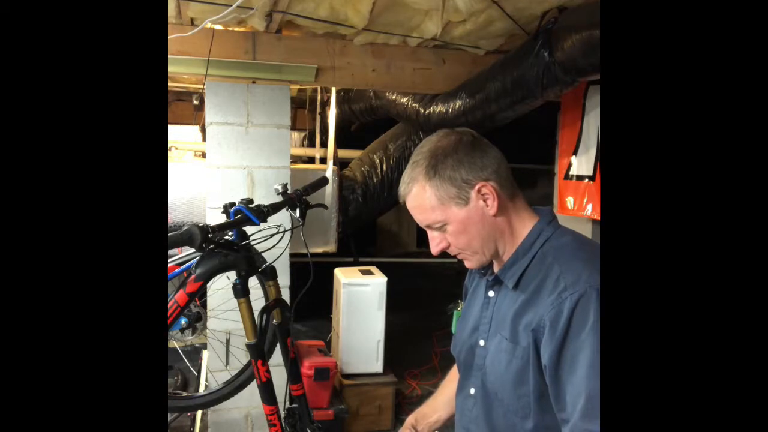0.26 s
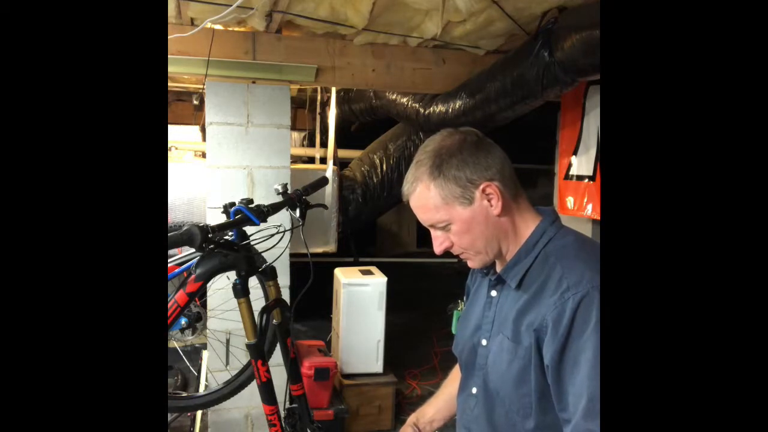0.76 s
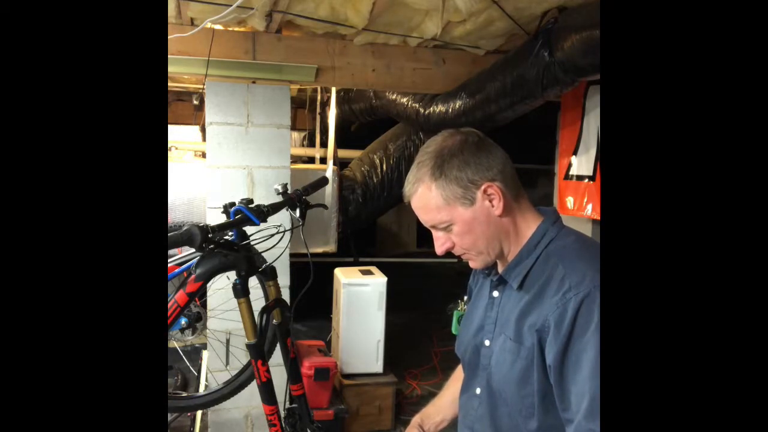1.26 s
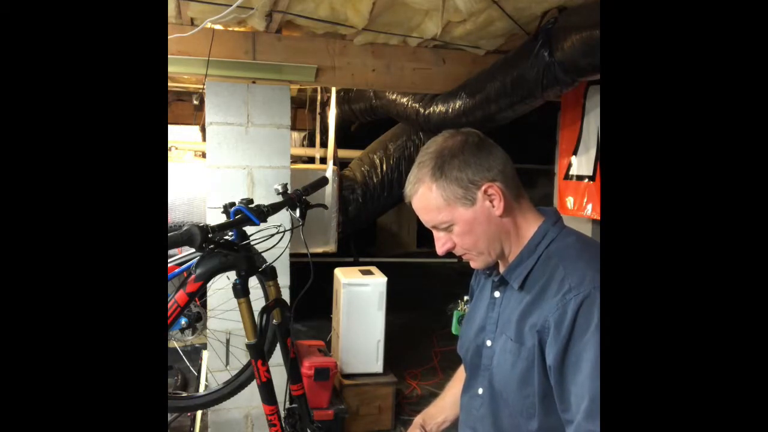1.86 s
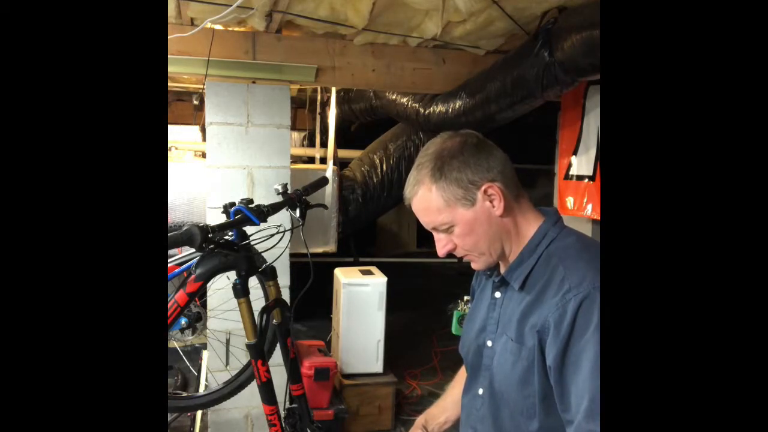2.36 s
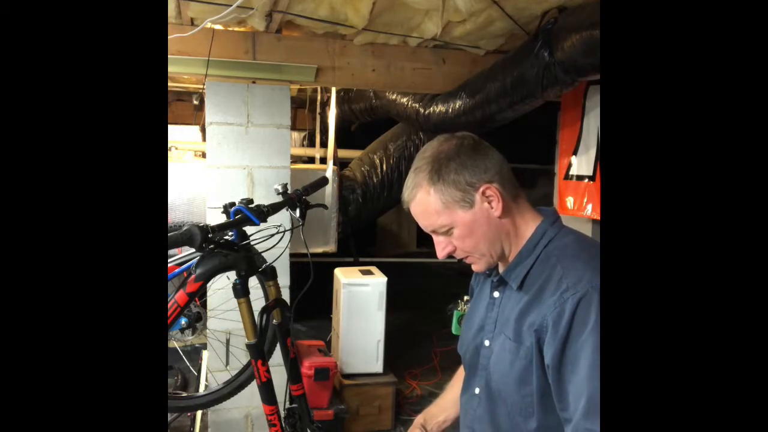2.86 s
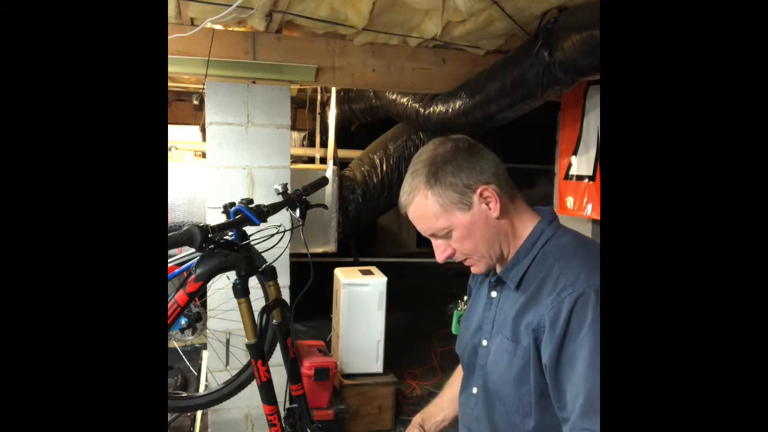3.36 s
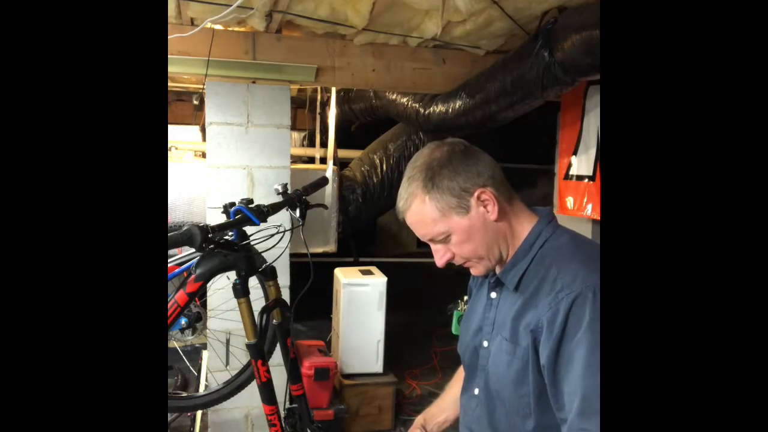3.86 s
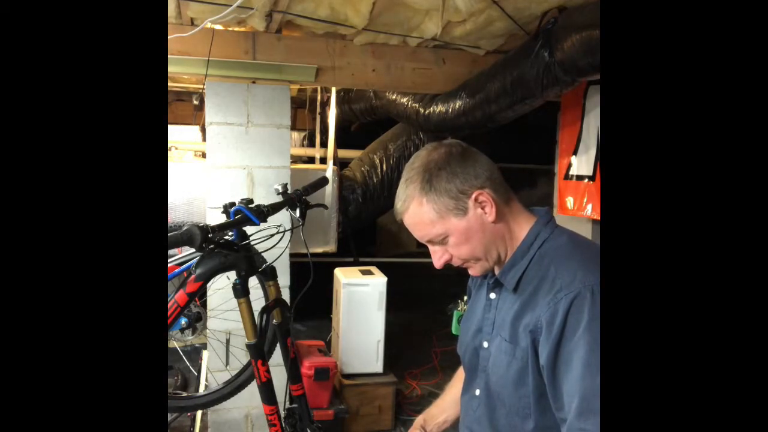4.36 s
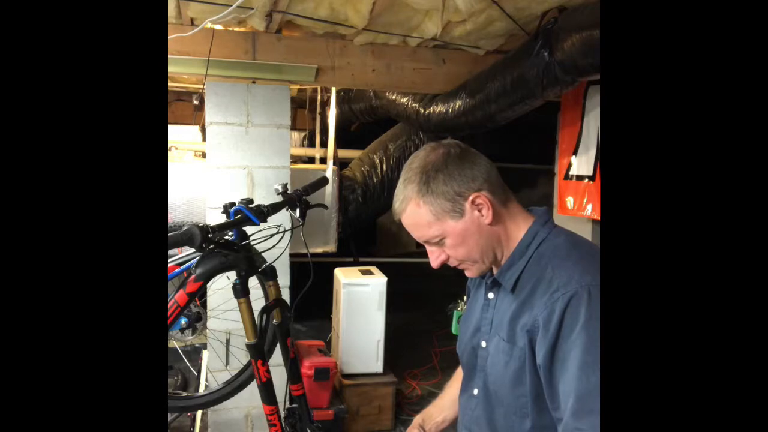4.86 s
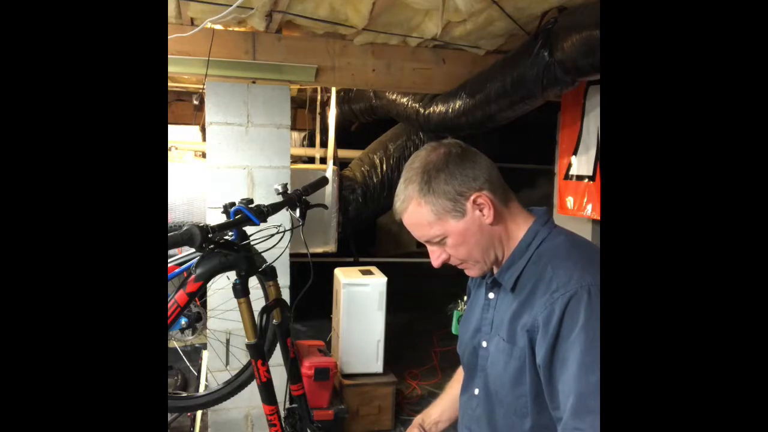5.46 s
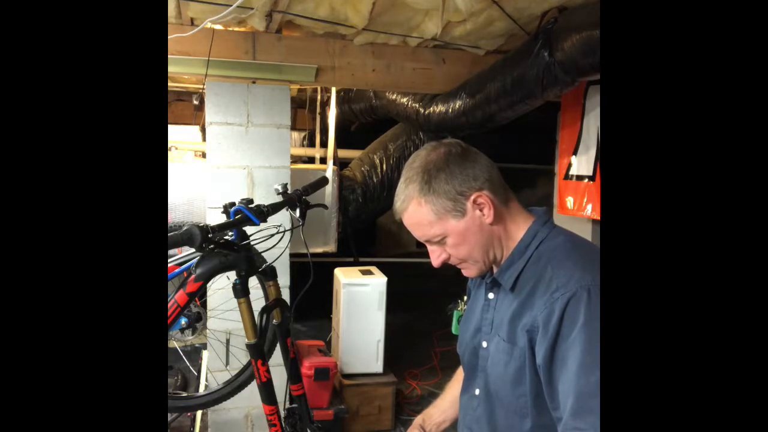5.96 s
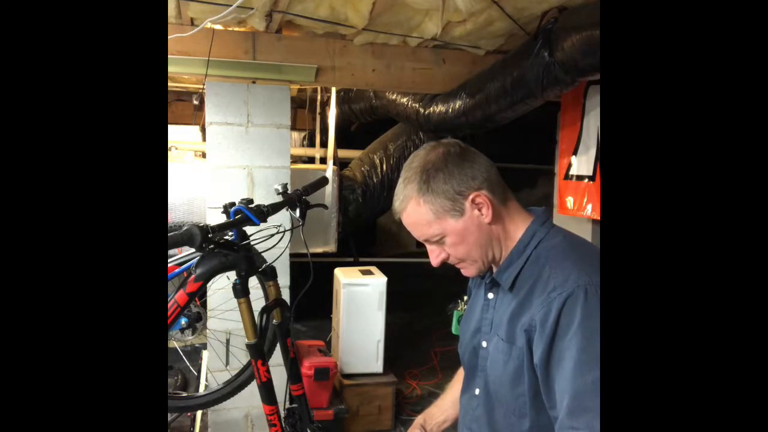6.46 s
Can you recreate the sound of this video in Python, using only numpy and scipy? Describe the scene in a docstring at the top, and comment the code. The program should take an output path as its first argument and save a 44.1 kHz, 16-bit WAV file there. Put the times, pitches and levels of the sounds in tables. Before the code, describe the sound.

A close single microphone in a low, cluttered basement workshop picks up compressed air rushing into a bicycle tire: a bright, steady, high hiss with a lower hose rush and thin wavering whistles. Faint room rumble and a low motor hum sit far beneath. At about 0.6 seconds the hiss drops and fades slightly; at 1.0 a crisp metallic trigger click with a tiny rattle and spit of air brings it surging back, with a small tick at the stop. At 1.4 the tire bead pops onto the rim, short and dry with a soft thump. At 3.2 comes a far louder, hard crack and hollow thump, with a quick rebound, short room reflections and a ringing wheel dying within a fraction of a second; a small rubber tick follows, and a very faint one near 3.8. Hiss continues, easing from 5.2, then clicks open stronger at 5.9 and holds to the end.

```python
"""Compressed air hisses through an inflator into a bicycle tire in a low basement workshop: filtered noise
and narrow resonances follow the flow. The trigger is eased off twice and clicks open again, as decaying
body modes and a spit of air; the bead snaps onto the rim twice, as short cracks and thumps, and sets the
wheel's modes ringing. Under it lie a motor's hum, from wavering sines, and the noise rumble of the room.
One microphone, close by."""
import sys
import numpy as np
from scipy import signal
from scipy.fft import rfft, irfft
from scipy.io import wavfile

SR = 44100
rng = np.random.default_rng(int(sys.argv[2]) if len(sys.argv) > 2 else 0)


def unload_audio(sound):
    """Save the sound as a 16-bit wav file, at the path given as the first command line argument."""
    columns = np.transpose(np.atleast_2d(sound))
    # keep every value between -1 and 1, then stretch to whole-number steps
    steps = np.round(np.clip(columns, -1, 1) * 32767)
    wavfile.write(sys.argv[1], SR, steps.astype(np.int16))


N = 295470
TIME = np.arange(N) / SR

# Squeezes of the trigger. Each row: time in seconds, click level in dB, bounce level in dB, rattle level
# in dB, travel to the stop in seconds, level of the tick at the stop in dB, surge of air in dB.
SQUEEZES = [(1.0298, -23.5, -24.5, -38, 0.082, -33.5, 2), (5.9464, -21.5, -30, -24, 0.093, -46, 2.5)]
# Snaps of the bead onto the rim. Each row: time in seconds, slip level in dB, crack level in dB, crack
# frequency in Hz, crack t60 in seconds, contact hardness as a low-pass corner in Hz, thump level in dB,
# thump frequency in Hz, casing level in dB, wheel ring level in dB, fall of the wheel modes away from
# the thump frequency in dB per octave.
SNAPS = [(1.4186, -31, -8, 1760, 0.0027, 2630, -21.5, 373, -24, -29.5, 5.5),
         (3.218, -4, -1, 1190, 0.007, 4800, -10, 585, -35, -23, 3.5)]


def from_db(db):
    """Decibels to gain: twenty decibels are a factor of ten in amplitude."""
    return 10 ** (np.asarray(db) / 20)


def rms_one(x):
    """Normalize the mean power, so that the rms is 1."""
    return x / np.sqrt(np.mean(x ** 2) + 1e-20)


def at_hz(points, hz):
    """Interpolate linearly along a logarithmic frequency axis."""
    points = np.array(points)
    return np.interp(np.log(np.maximum(hz, 1)), np.log(points[:, 0]), points[:, 1])


def coloured(spectrum):
    """Spectral shaping of white noise, falling away steeply beyond the ends of the table; rms 1."""
    hz = np.fft.rfftfreq(N, 1 / SR)
    low_skirt = np.minimum(hz / spectrum[0][0], 1) ** 3
    high_skirt = np.minimum(spectrum[-1][0] / (hz + 1), 1) ** 3
    gain = from_db(at_hz(spectrum, hz)) * low_skirt * high_skirt
    return rms_one(irfft(rfft(rng.standard_normal(N)) * gain, N))


def drift(rate_hz):
    """Slow random modulation: noise whose amplitude spectrum has halved at the given rate; rms 1."""
    hz = np.fft.rfftfreq(N, 1 / SR)
    return rms_one(irfft(rfft(rng.standard_normal(N)) / (1 + (hz / rate_hz) ** 2), N))


def resonance(x, hz, width):
    """Simple resonance: a two-pole band-pass with gain near 1 at its peak."""
    radius = np.exp(-np.pi * width / SR)
    zeros = np.array([1, 0, -1]) * (1 - radius * radius) / 2
    poles = [1, -2 * radius * np.cos(2 * np.pi * hz / SR), radius * radius]
    return signal.lfilter(zeros, poles, x)


def cut(x, hz, kind, order=2):
    """Maximally flat (Butterworth) low- or high-pass filtering."""
    return signal.sosfilt(signal.butter(order, hz, kind, fs=SR, output="sos"), x + 1e-18)


def ring(hz, t60, phase=0):
    """Free vibration of a damped mode: a sine losing 60 dB in t60 seconds, one second long."""
    t = TIME[:SR]
    return np.sin(2 * np.pi * hz * t + phase) * np.exp(-np.log(1000) * t / t60)


def add(track, s, sound):
    """Superposition: mix a sound into the track at time s."""
    start = round(s * SR)
    track[start:start + len(sound)] += sound[:N - start]


def flow(steady_db=-2, surge_s=0.35, ease_s=0.083):
    """Throttled flow in dB: each squeeze frees pent-up pressure; easing off drops the flow, then fades it."""
    # Easings, each lasting until the next squeeze. Each row: time in seconds, first drop in dB,
    # further fade in dB per second.
    easings = [(0.62, 4.0, 7.5), (5.21, 1, 16)]
    level_db = np.full(N, float(steady_db))
    for s, *_, surge_db in SQUEEZES:
        level_db += surge_db * (TIME >= s) * np.exp(-np.abs(TIME - s) / surge_s)
    for (s, drop_db, fade_db_per_s), (squeezed_s, *_) in zip(easings, SQUEEZES):
        since = np.maximum(TIME - s, 0) * (TIME < squeezed_s)
        level_db -= drop_db * np.minimum(since / ease_s, 1) + fade_db_per_s * since
    return level_db


def nearby_echoes(x, echo_db=-6.5, count=10):
    """Comb filtering: hand, wheel and wall send back a few short echoes, of echo_db together."""
    out = x.copy()
    lags_s = rng.uniform(0.002, 0.016, count)
    for lag in (lags_s * SR).astype(int):
        out += rng.choice([-1, 1]) * from_db(echo_db) / np.sqrt(count) * np.roll(x, lag)
    return out


def air(flutter_db=0.29, whistle_waver_db=0.5, jet_db=-45.5, rush_db=-58.5, rush_growth=0.68):
    """Turbulent flow noise: a bright jet, a lower rush in the hose and resonances of valve and nozzle."""
    # Spectrum of the jet. Each row: frequency in Hz, density in dB per Hz.
    jet_spectrum = [(2060, -39), (3500, -10), (3700, -15.5), (5040, -7.5), (5680, -6.5), (6120, -9.5),
                    (6560, -5), (7630, -4), (9500, -8), (12500, 0), (13400, -1.5), (15100, -1), (15700, -1)]
    # Spectrum of the lower rush in the hose. Each row: frequency in Hz, density in dB per Hz.
    rush_spectrum = [(500, -3), (1000, -5), (1700, -7), (2300, 0.5), (2750, 0.5), (3080, -3), (3400, -1),
                     (4500, -1.5), (6000, -38)]
    # Resonances of valve and nozzle. Each row: frequency in Hz, width in Hz, level in dB at a flow of
    # 0 dB, growth in dB per dB of flow.
    whistle_modes = [(2280, 84, -72, 0.1), (6070, 45, -63, 0.7), (6270, 110, -58.5, 2.9),
                     (6900, 36, -77, 0), (7385, 77, -64.5, 0.16), (7670, 140, -66.5, 0.3),
                     (9700, 70, -66, 1.5), (12190, 92, -58, 3), (12730, 210, -57, 3.5)]
    flow_db = flow() + flutter_db * drift(14)
    jet = from_db(jet_db + flow_db) * coloured(jet_spectrum)
    # the rush grows more slowly than the jet
    rush = from_db(rush_db + rush_growth * flow_db) * coloured(rush_spectrum)
    whistles = np.zeros(N)
    for hz, width, db, growth in whistle_modes:
        level_db = db + growth * flow_db + whistle_waver_db * drift(4.36)
        whistles += from_db(level_db) * rms_one(resonance(rng.standard_normal(N), hz, width))
    return nearby_echoes(jet + rush) + whistles


def background(rumble_db=-52.47, hiss_db=-60.5, hum_waver_db=1.8):
    """Stationary noise and tones: room rumble, faint hiss and the hum and whine of a running motor."""
    # Room rumble. Each row: frequency in Hz, density in dB per Hz.
    rumble_spectrum = [(25, -32), (40, -14.5), (58, 1), (70, 1), (90, -4.5), (115, 0), (150, -10),
                       (230, -8), (265, -13.5), (335, -9.5), (530, -12), (630, -18.5), (900, -23.5)]
    # Faint hiss under everything. Each row: frequency in Hz, density in dB per Hz.
    hiss_spectrum = [(500, -15), (900, -4), (1400, -5.5), (2500, -9.5), (6000, -8), (9500, -24),
                     (15500, -4)]
    # Motor tones. Each row: frequency in Hz, mean rms level in dB, phase wander in radians.
    motor_tones = [(119.4, -57, 0.087), (886, -74, 0.29)]
    hum = np.zeros(N)
    for hz, db, wander in motor_tones:
        tone = np.sqrt(2) * np.sin(2 * np.pi * hz * TIME + wander * drift(1.8))
        hum += tone * from_db(db + hum_waver_db * drift(3.8))
    return hum + from_db(rumble_db) * coloured(rumble_spectrum) + from_db(hiss_db) * coloured(hiss_spectrum)


def trigger_contacts(bounce_s=0.0025, rattle_s=0.0145, click_hz=8550, rattle_hz=3300, stop_hz=4500):
    """Successive impacts of click, bounce, lever rattle and stop: seconds, dB, hardness (low-pass) in Hz."""
    for s, click_db, bounce_db, rattle_db, travel_s, stop_db, _ in SQUEEZES:
        yield s, click_db, click_hz
        yield s + bounce_s, bounce_db, click_hz
        yield s + rattle_s, rattle_db, rattle_hz
        yield s + travel_s, stop_db, stop_hz


def trigger(spit_db=-8, spit_s=0.0023, spit_low_hz=1200):
    """Impact excitation of modes: the valve's metal body rings at each contact and air spits out."""
    # Modes of the inflator body. Each row: frequency in Hz, level in dB, t60 in seconds.
    body_modes = [(1050, -22.5, 0.023), (1690, -17, 0.019), (2096, -16, 0.015), (2540, -17.5, 0.039),
                  (2710, -10.5, 0.009), (3270, -19, 0.03), (4090, -12, 0.0095), (4970, -6.5, 0.0044),
                  (6890, -4.5, 0.0083), (9200, -4, 0.005), (11200, 6, 0.0019)]
    out, t = np.zeros(N), TIME[:SR]
    for s, level_db, hardness_hz in trigger_contacts():
        body = sum(from_db(db) * ring(hz, t60, rng.uniform(0, 2 * np.pi)) for hz, db, t60 in body_modes)
        spit = cut(rng.standard_normal(SR) * np.exp(-t / spit_s), spit_low_hz, "high")
        contact = cut(body + from_db(spit_db) * spit, hardness_hz, "low")
        add(out, s, from_db(level_db) * contact)
    return out


def workshop(x, early_db, late_db, early_t60=0.093, first_s=0.00084, echoes_per_s=2500):
    """Reverberation: scattered echoes from ceiling and clutter, and a diffuse tail decaying band by band."""
    # Decay of the tail. Each row: frequency in Hz, t60 in seconds.
    room_t60 = [(100, 9), (350, 1.16), (1000, 0.22), (2000, 0.7), (4000, 0), (12000, 1)]
    # Colour of the reflections. Each row: frequency in Hz, gain in dB.
    room_colour = [(60, -34), (150, -27), (400, 6), (1000, 4.5), (2500, 6.5), (5000, 4), (14000, -1.5)]
    t, hz = TIME[:SR], np.fft.rfftfreq(SR, 1 / SR)
    begun = t > first_s
    echoes = rng.choice([-1, 1], SR) * (rng.random(SR) < echoes_per_s / SR)
    early = echoes * begun * np.exp(-np.log(1000) * t / early_t60)
    white, late = rfft(rng.standard_normal(SR)), np.zeros(SR)
    centres = np.geomspace(100, 12800, 8)
    # each row of the identity matrix makes one of the overlapping octave bands
    for centre, share in zip(centres, np.eye(len(centres))):
        band = irfft(white * at_hz(np.column_stack([centres, share]), hz), SR)
        late += band * begun * np.exp(-np.log(1000) * t / at_hz(room_t60, centre))
    response = (from_db(early_db) * rms_one(early) + from_db(late_db) * rms_one(late)) / np.sqrt(SR)
    response = irfft(rfft(response) * from_db(at_hz(room_colour, hz)), SR)
    return signal.fftconvolve(x, response[:SR * 3 // 4])[:N]   # the tail ends at 0.75 s


def crack(hz, t60, hardness_hz, rub_db=-25, rub_s=0.0054):
    """Contact impact of rubber: a briefly ringing mode and a burst of rubbing, dulled by a soft contact."""
    rub = cut(rng.standard_normal(SR) * np.exp(-TIME[:SR] / rub_s), hardness_hz, "low", order=1)
    return cut(ring(hz, t60), hardness_hz, "low") + from_db(rub_db) * rub


def thump(hz, cycles=7.0):
    """Heavily damped oscillation: the sidewall's swing falls 60 dB in a few cycles."""
    return ring(hz, cycles / hz)


def bead_snaps(thump_lag_s=0.00222, casing_lag_s=0.00545, lowest_hz=120):
    """Snap-through: the bead slips, slaps home and rebounds; sidewall and casing thump; the rubber settles."""
    # Modes of the jolted casing. Each row: frequency in Hz, relative level in dB, t60 in seconds.
    casing_modes = [(137, 1.5, 0.053), (275, -19, 0.027), (850, -5, 0.0077)]
    # Ticks of the settling rubber. Each row: time in seconds, level in dB, frequency in Hz, t60 in seconds.
    settling_ticks = [(3.277, -21, 1800, 0.0037), (3.763, -44, 1020, 0.0098)]
    slip_lead_s, slip_hz, slip_t60 = 0.001417, 2430, 0.0037
    slip_sharper = 1.7   # the slip over the rim's shoulder has a sharper edge than the slap
    rebound_s, rebound_hz, rebound_t60, rebound_loss_db = 0.0145, 3140, 0.0084, 17
    second_thump_ratio, second_thump_loss_db = 0.464, 8   # lower and softer than the first
    out = np.zeros(N)
    for (s, slip_db, crack_db, crack_hz, crack_t60, hardness_hz,
         thump_db, thump_hz, casing_db, _, _) in SNAPS:
        slip = crack(slip_hz, slip_t60, hardness_hz * slip_sharper)
        add(out, s - slip_lead_s, from_db(slip_db) * slip)
        add(out, s, from_db(crack_db) * crack(crack_hz, crack_t60, hardness_hz))
        add(out, s + thump_lag_s, from_db(thump_db) * thump(thump_hz))
        casing = sum(from_db(casing_db + db) * ring(hz, t60) for hz, db, t60 in casing_modes)
        add(out, s + casing_lag_s, casing)
        rebound = crack(rebound_hz, rebound_t60, hardness_hz)
        add(out, s + rebound_s, from_db(slip_db - rebound_loss_db) * rebound)
        second_thump = from_db(thump_db - second_thump_loss_db) * thump(thump_hz * second_thump_ratio)
        add(out, s + rebound_s + thump_lag_s, second_thump)
    for s, db, hz, t60 in settling_ticks:
        add(out, s, from_db(db) * crack(hz, t60, hardness_hz=3000))
    return cut(out, lowest_hz, "high")


def wheel(spread_s=0.0026):
    """Modal excitation: each snap runs round the rim and builds up modes, most those near its thump."""
    # Modes of rim, spokes and air chamber. Each row: frequency in Hz, relative level in dB, t60 in seconds.
    wheel_modes = [(154, -5.5, 0.9), (228, -9.5, 0.24), (272, -15.5, 0.31), (311, -3, 0.32),
                   (330, -16, 0.4), (359, -11, 0.271), (337, -17.5, 0.92), (375, -14, 0.94),
                   (464, -1.5, 0.3), (592, 1, 0.14), (700, -15, 0.12), (741, -22, 0.78), (766, -10.5, .3),
                   (791, -6.5, 0.22), (1020, -9, 0.19), (1050, -4, 0.19), (1124, -16.5, 0.52),
                   (1094, -10.5, 0.21), (1287, -19.5, .21), (1408, -10, 0.31), (1570, -14, 0.46),
                   (1670, -13.5, 0.11), (1680, -9, 0.27), (1930, -26, 0.23), (2002, -20, 0.31),
                   (2280, -20, .14), (2370, -20, 0.165), (2920, -18.5, 0.12), (3779, -3.5, 0.14)]
    build_up = 1 - np.exp(-TIME[:SR] / spread_s)
    out = np.zeros(N)
    for s, *_, thump_hz, _, ring_db, fall_db in SNAPS:
        modes = np.zeros(SR)
        for hz, db, t60 in wheel_modes:
            octaves_away = abs(np.log2(hz / thump_hz))
            modes += from_db(db - fall_db * octaves_away) * ring(hz, t60, rng.uniform(0, 2 * np.pi))
        add(out, s, from_db(ring_db) * modes * build_up)
    return out


def scene():
    """Superposition of all sources at one microphone, identical in both channels."""
    snaps, clicks = bead_snaps(), trigger()
    tire = snaps + wheel() + workshop(snaps, early_db=-4.5, late_db=-17.5)
    inflator = air() + clicks + workshop(clicks, early_db=-7.5, late_db=-12)
    return np.tile(tire + inflator + background(), (2, 1))


def record(dry, cutoff_hz=15750):
    """Clipping and band-limiting: full scale limits the peaks, then a steep low-pass cuts the top."""
    top_cut = signal.ellip(12, 0.1, 70, cutoff_hz, fs=SR, output="sos")
    return signal.sosfilt(top_cut, np.clip(dry, -1, 1))


dry = scene()
out = record(dry)
unload_audio(out)
```